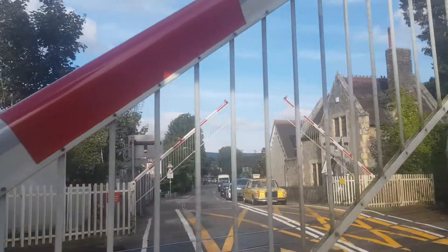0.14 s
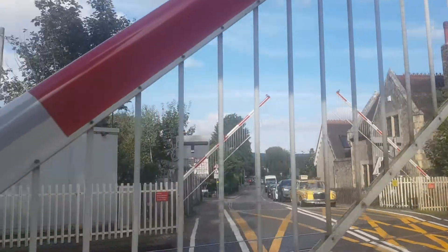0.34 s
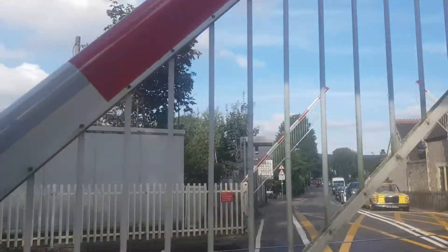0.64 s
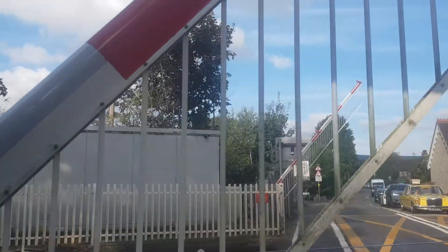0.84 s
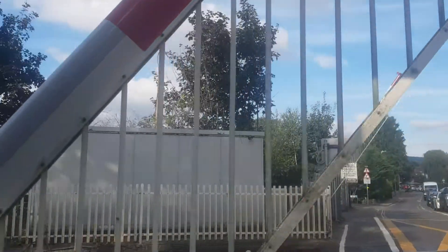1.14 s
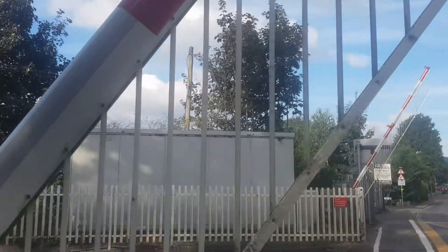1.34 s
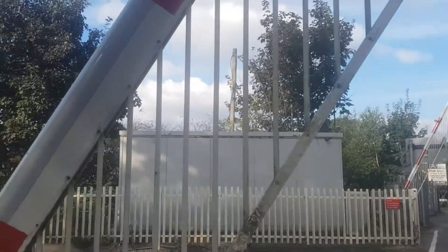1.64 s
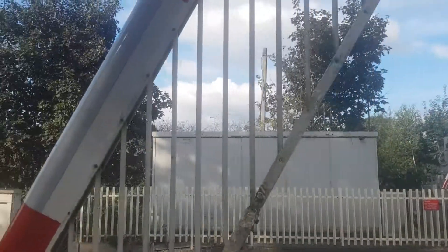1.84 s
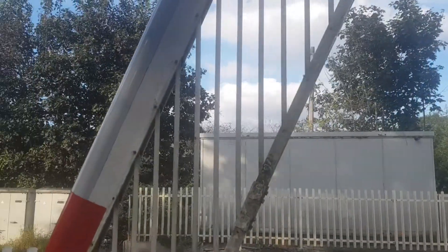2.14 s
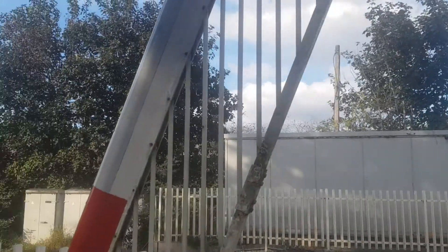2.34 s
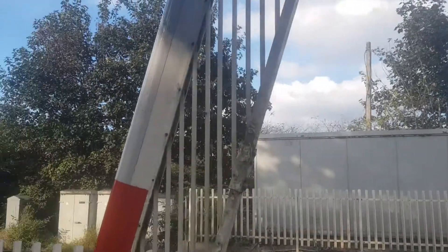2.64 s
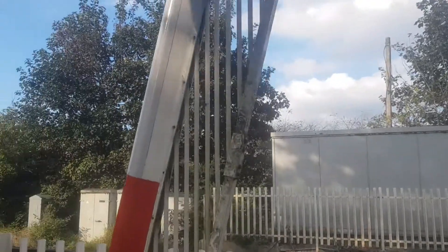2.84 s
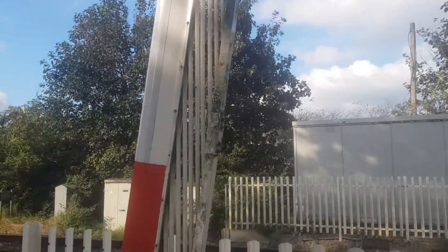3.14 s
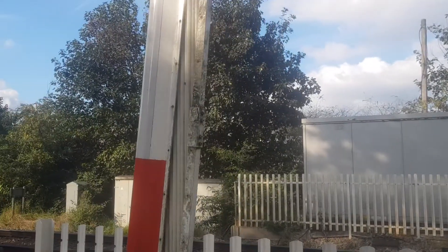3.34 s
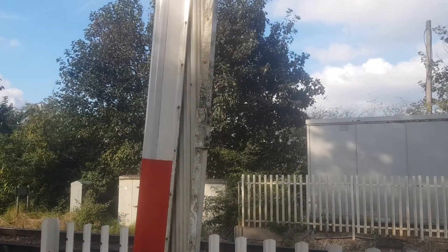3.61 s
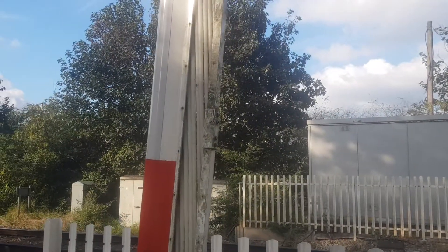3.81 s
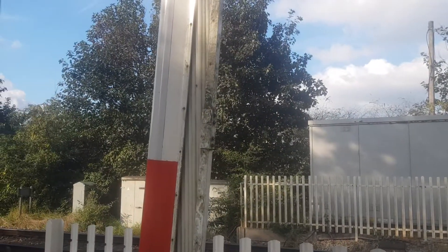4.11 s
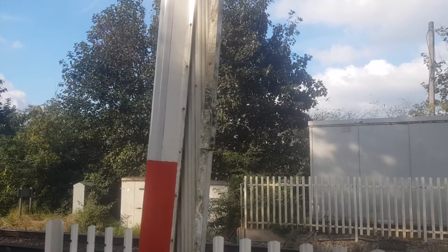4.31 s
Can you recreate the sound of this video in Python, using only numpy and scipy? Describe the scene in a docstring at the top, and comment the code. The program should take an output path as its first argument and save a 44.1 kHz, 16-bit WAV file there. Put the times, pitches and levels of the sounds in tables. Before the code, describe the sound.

From the start, the hydraulic pump of a level crossing barrier hums steadily close to the microphone, a mid-pitched, slightly buzzy tone that wavers as fainter pumps farther off beat against it. The pivot gives a few faint, short squeaks in the first quarter second. Underneath, cars pull away outdoors, their engines rising in pitch while road rumble and tyre hiss build over three seconds and shift toward the right. From about 1.4 seconds, loose metal rods rattle lightly, with occasional small clanks. Around 3 seconds the hum swells and rises slightly. At about 3.3 seconds the boom hits its stop with a quick run of heavy, ringing metal knocks, the loudest moment, and the hum cuts out. The rods go on clanking irregularly, most clearly near 3.9 seconds, while the nearest car accelerates with low surges until the end at about 4.5 seconds.

```python
"""Level crossing barrier rising.

Beside a hand-held phone a hydraulic gear pump hums; the pumps of the other booms beat with it.
The dry pivot squeaks, the boom clunks onto its stop and the rods of its folded skirt rattle.
Waiting cars pull away and come closer; the phone turns, leaving the road on its right."""
import sys
import numpy as np
from scipy import signal
from scipy.fft import rfft, irfft
from scipy.io import wavfile
from scipy.ndimage import uniform_filter1d, map_coordinates

SR = 44100
rng = np.random.default_rng(int(sys.argv[2]) if len(sys.argv) > 2 else 0)


def waveform_to_disk(signal):
    """Save audio, clipped to [-1, 1], as 16-bit WAV at the path in sys.argv[1]."""
    frames = np.transpose(np.atleast_2d(signal))
    scaled = np.clip(frames, -1, 1) * 32767
    samples = np.round(scaled).astype(np.int16)
    wavfile.write(sys.argv[1], SR, samples)


N = 197068
TIME = np.arange(N) / SR

# road noise spectra: freq_hz, density_db
RUMBLE_SPECTRUM = [(18, -25.5), (35, -4), (70, 6), (120, -3), (200, 0), (300, -14), (450, -18.5),
                   (700, -44)]
ROAR_SPECTRUM = [(200, -4), (380, 4.5), (520, -5), (640, -2), (820, -0.5), (1080, -4.5), (1350, -13.5),
                 (2000, -13.5), (4000, -42)]
HISS_SPECTRUM = [(700, -26), (1300, -3), (2000, -1.5), (3300, -8), (4700, -11.5), (6200, -24),
                 (8300, -34.5), (11500, -23.5), (15500, -36.5)]
# left port's lag for sound from the road: time_s, lag_ms
ROAD_LAG = [(0, -0.25), (1.2, -0.19), (1.7, 0.33), (2.5, 0.31), (4.47, 0.43)]
# engine speeds of three cars: time_s, firing_hz
FIRST_SPEED = [(0, 79.83), (1.42, 83.94), (1.7, 110.6), (2.1, 118.8)]
SECOND_SPEED = [(1.8, 86.93), (2.8, 110.5), (3.3, 112.3)]
NEAR_SPEED = [(1.9, 66.26), (2.55, 72.6), (2.95, 84.9), (3.13, 74.24), (3.45, 77.17), (3.92, 88.3),
              (4.47, 104.7)]
# their exhaust partials: firing_multiple, gain_db
FIRST_EXHAUST = [(.5, -9.5), (1, -1), (1.5, -12), (2, -15), (2.5, -10.5), (3.5, -18.5)]
SECOND_EXHAUST = [(.5, -18.5), (1, -0.5), (2, -4), (3, -16.5)]
NEAR_EXHAUST = [(.5, -29), (1, -3), (1.5, -25.5), (2, -17.5), (3, -18.5), (4, -20.5)]
# their swells under load: start_s, end_s, level_db, swell_db_per_s
FIRST_PULL = (0, 1.88, -47, 5.5)
SECOND_PULL = (2.05, 3, -41, 3)
NEAR_PULL = (2, 5, -40.5, 5)
# surges of the nearest exhaust: start_s, end_s, lift_db
SURGES = [(2.05, 2.073, 7), (2.655, 2.816, 10), (2.95, 3.045, 7), (3.768, 3.914, 8), (4.068, 4.22, 11),
          (4.34, 4.424, 9)]
# pumps of two further booms: start_s, end_s, tooth_hz, sag_hz_per_s, level_db, swell_db_per_s
FAR_PUMPS = [(0, 1.296, 329, 5.5, -44, -4), (0.893, 3.093, 352.4, 4.5, -49.5, 4.5)]
# near pump, speeding up as the load comes off: time_s, tooth_hz
PUMP_SPEED = [(0, 360), (.5, 358.4), (1.2, 357.2), (1.6, 358.2), (2.85, 356.8), (3.12, 365), (3.3, 366)]
# its hum: time_s, fundamental_db, octave_db
PUMP_HUM = [(0, -29.5, -41.5), (.65, -31.5, -44.5), (1, -31, -39), (1.5, -30, -40.5), (1.8, -28.5, -43),
            (2.35, -33, -43.5), (2.82, -39, -43), (3.02, -27.3, -43), (3.3, -29, -44.5)]
# its overtones: tooth_multiple, re_fundamental_db
PUMP_OVERTONES = [(4, -37), (5, -37), (6, -37.5), (8, -36.5)]
# its gear buzz: freq_hz, density_db
BUZZ_SPECTRUM = [(400, -27.5), (700, 13.5), (1100, -6), (1500, -12), (3000, -20), (4800, -16), (7000, -23),
                 (9000, -50.5)]
# pivot squeaks: start_s, length_s, pitch_hz, level_db
SQUEAKS = [(0.045, 0.059, 2353, -54.5), (0.175, 0.035, 2370, -54), (0.206, 0.045, 2280, -46.5),
           (1.062, 0.026, 4840, -62)]
# skirt rod modes: freq_hz, gain_db
ROD_MODES = [(1816, -6), (2106, 0), (2170, 0), (2400, -4), (2660, -1), (2790, -4), (2900, -3), (3110, -2),
             (3340, 0), (3600, -6), (3900, -6), (4650, -11)]
# bouts of rattle as the skirt folds and settles: start_s, end_s, level_db, swell_db_per_s
JIGGLES = [(0, .28, -63, -10), (1.52, 2.203, -53, 5), (2.394, 3.014, -57, 14.5), (3.403, 4.47, -58.5, 11.5)]
# rod clanks: start_s, level_db, hardness_db (tick over ring), pitch_hz
CLANKS = [(1.362, -46.5, -16.5, 2500), (2.260, -44, 2.5, 6120), (2.618, -43, -13, 3340),
          (3.060, -44, -11, 3480), (3.115, -44.5, -7, 2300), (3.419, -39.5, -16, 2500),
          (3.476, -37.5, -35, 1810), (3.615, -37, -6, 2502), (3.653, -44.5, -7, 3550),
          (3.709, -39, -14, 3290), (3.900, -39, -10, 2140), (3.920, -33, -11.5, 2200),
          (4.149, -39, -1.5, 5900), (4.221, -41.5, -6.5, 2860), (4.344, -40, -5, 2430),
          (4.448, -41, -9, 1990)]
# boom and pedestal modes: freq_hz, gain_db, t60_s
BOOM_MODES = [(287.8, 0.5, 0.53), (317, -9.5, 0.21), (341, 3, 0.26), (378, 0.5, 0.41), (418.6, -2, 0.52),
              (487, -9, 0.49), (777, 0.5, 0.13), (1272, -3, .15), (1534, -9, .2), (1818, -3, .18),
              (2106, 4, .26), (2202, 2, .21), (2458, -5, .2), (3600, -17, 0.05), (4970, -10, 0.17),
              (5100, -9, .14)]
# dense high modes of a blow: freq_hz, density_db
CRACK_SPECTRUM = [(100, -18), (300, 1.5), (500, 0.5), (900, -8.5), (2200, 2), (3300, -7), (5200, -8.5),
                  (6800, -24), (8500, -34), (11000, -19.5), (13000, -20.5), (16000, -25)]
# blows of the boom on its stop: start_s, thud_db, ring_db, tick_db, chatter_s, pitch_hz
LANDING = [(3.281, -23, -37.5, -72, 0.011, 1095), (3.293, -27, -51, -44, 0.0014, 1471),
           (3.343, -30, -26.5, -44, 0.0053, 2290), (3.353, -24, -21.5, -29.5, 0.0057, 2153),
           (3.365, -22.5, -31.5, -50, 0.014, 1720)]
# microphone port mismatch: freq_hz, left_over_right_db
PORT_BALANCE = [(60, 1.4), (300, 0.8), (1000, 0.1), (2000, -0.5), (4000, -0.5), (8000, -1.5), (12000, 1.5)]


def undb(db):
    """Decibels to gain."""
    return 10 ** (np.asarray(db) / 20)


def unit(x):
    """Scale to rms 1."""
    return x / np.sqrt(np.mean(x ** 2))


def curves(rows):
    """Table columns, interpolated over time."""
    times_s, *columns = np.transpose(rows)
    return [np.interp(TIME, times_s, column) for column in columns]


def walk(rate_hz):
    """Random steps, smoothed twice; spread near 1."""
    hold = max(int(SR / rate_hz), 20)
    steps = rng.standard_normal(N // 20 + 1)[np.arange(N) // hold]
    return 1.26 * uniform_filter1d(uniform_filter1d(steps, hold), hold)


def decay(t, t60_s):
    """Exponential fall, 60 dB in t60_s."""
    return np.exp(-np.log(1000) * t / t60_s)


def gate(start_s, end_s, attack_s, release_s):
    """Trapezoid, fully open from start_s to end_s."""
    return np.clip(np.minimum(1 + (TIME - start_s) / attack_s, 1 - (TIME - end_s) / release_s), 0, 1)


def swell(start_s, end_s, level_db, db_per_s, attack_s, release_s):
    """Gated gain, ramping in dB while open."""
    elapsed_s = np.clip(TIME, start_s, end_s) - start_s
    return undb(level_db + db_per_s * elapsed_s) * gate(start_s, end_s, attack_s, release_s)


def cycles(hz):
    """Running cycle count."""
    return np.cumsum(hz) / SR + rng.random()


def tone(turns):
    """Sine of rms 1, random phase."""
    return np.sqrt(2) * np.sin(2 * np.pi * (turns + rng.random()))


def colour(x, spectrum):
    """Shape by a spectrum, falling 20 dB per octave past its ends; rms 1."""
    hz, db = np.transpose(spectrum)
    octave = np.log2(np.maximum(np.fft.rfftfreq(x.shape[-1], 1 / SR), 1))
    beyond = np.abs(octave - np.clip(octave, np.log2(hz[0]), np.log2(hz[-1])))
    gain = undb(np.interp(octave, np.log2(hz), db) - 20 * beyond)
    return unit(irfft(rfft(x) * gain, x.shape[-1]))


def ports(x, lag_ms):
    """Arrival at two microphone ports; positive lag puts the source on the right."""
    at, half_lag = np.arange(len(x)), lag_ms * SR / 2000
    return np.array([map_coordinates(x, [at + side * half_lag], order=3, mode="nearest")
                     for side in (-1, 1)])


def diffuse(size):
    """Noise from all around: alike at both ports in the bass, unrelated in the treble."""
    mid, side = rfft(rng.standard_normal((2, size)))
    coherence = 0.985 * np.sinc(np.fft.rfftfreq(size, 1 / SR) / 1150)
    spectra = mid * np.sqrt(1 + coherence) + side * np.sqrt(1 - coherence) * np.array([[1], [-1]])
    return irfft(spectra, size) / np.sqrt(2)


def road(firings, lag_ms, approach_s=(0.43, 3.14)):
    """Rumble, tyre roar and hiss grow as the cars close in; the hiss clatters once per firing."""
    rumble_db = np.interp(TIME, approach_s, [-43.5, -32.5])
    roar_db = np.interp(TIME, approach_s, [-48, -38])
    hiss_db = np.interp(TIME, approach_s, [-58.5, -43])
    air_db = np.interp(TIME, [2.6, 4.1], [-69, -60])
    pulses = 0.79 + np.exp(-(firings % 1) / 0.15)
    clatter = unit(pulses * undb(2.4 * walk(70)) * rng.standard_normal(N))
    rumble = undb(rumble_db) * colour(diffuse(N), RUMBLE_SPECTRUM)
    roar_gain = undb(roar_db + 0.53 * walk(12))
    roar = roar_gain * colour(diffuse(N) + 0.5 * ports(rng.standard_normal(N), lag_ms), ROAR_SPECTRUM)
    hiss = undb(hiss_db + walk(31)) * colour(diffuse(N) + 0.62 * ports(clatter, lag_ms), HISS_SPECTRUM)
    air = undb(air_db) * colour(diffuse(N), [(9500, -8.5), (11000, -1.5), (15500, 3.5)])
    return rumble + roar + hiss + air


def engine(speed, pull, partials, rough_db, wobble, drone_hz=205, half_width_hz=11, drone_db=9):
    """Uneven firings drive an exhaust that drones at resonance. Returns sound, firing count."""
    firing_hz, = curves(speed)
    firings = cycles(firing_hz * (1 + wobble * walk(30)))
    exhaust = 0
    for k, gain_db in partials:
        lift_db = drone_db / (1 + ((k * firing_hz - drone_hz) / half_width_hz) ** 2)
        exhaust += undb(gain_db + lift_db + rough_db * walk(24.9)) * tone(k * firings)
    return exhaust * swell(*pull, attack_s=0.3, release_s=0.14), firings


def traffic():
    """Three cars pull away over road noise; the nearest exhaust surges."""
    lag_ms, = curves(ROAD_LAG)
    first, _ = engine(FIRST_SPEED, FIRST_PULL, FIRST_EXHAUST, rough_db=2, wobble=0.012)
    second, _ = engine(SECOND_SPEED, SECOND_PULL, SECOND_EXHAUST, rough_db=-1.8, wobble=0.0059)
    near, firings = engine(NEAR_SPEED, NEAR_PULL, NEAR_EXHAUST, rough_db=-0.5, wobble=0.0084)
    surge_db = sum(db * gate(*span_s, attack_s=0.073, release_s=0.1) for *span_s, db in SURGES)
    return ports(first + second + near * undb(surge_db), lag_ms) + road(firings, lag_ms)


def far_pumps():
    """Slightly slower pumps sag in speed and beat against the near one."""
    out = 0
    for start_s, end_s, tooth_hz, sag_hz_per_s, level_db, db_per_s in FAR_PUMPS:
        teeth = cycles(tooth_hz - sag_hz_per_s * (TIME - start_s))
        hum = tone(teeth) + undb(-12.5) * tone(2 * teeth)
        out += hum * swell(start_s, end_s, level_db, db_per_s, attack_s=0.81, release_s=0.67)
    return ports(out, lag_ms=0.05)


def near_pump(stop_s=3.31, release_s=0.071, valve_hz=(1005, 1115)):
    """Gear teeth pulse the oil; their flaws buzz, repeating every five teeth; a valve rushes."""
    tooth_hz, = curves(PUMP_SPEED)
    hum_db, octave_db = curves(PUMP_HUM)
    teeth = cycles(tooth_hz * (1 + 0.00071 * walk(25)))
    hum = undb(hum_db + 0.36 * walk(51)) * tone(teeth)
    hum += undb(octave_db + walk(25)) * tone(2 * teeth)
    whine = sum(undb(db + 2 * walk(13)) * tone(k * teeth) for k, db in PUMP_OVERTONES)
    flaws = np.interp(teeth / 5 % 1, np.linspace(0, 1, 500), rng.standard_normal(500))
    buzz = undb(-22.5) * colour(flaws, BUZZ_SPECTRUM)
    valve = signal.butter(2, valve_hz, "band", fs=SR, output="sos")
    flow = undb(octave_db - 11) * unit(signal.sosfilt(valve, rng.standard_normal(N)))
    running = np.clip(1 + (stop_s - TIME) / release_s, 0, 1)
    return ports(running * (hum + undb(hum_db) * (whine + buzz) + flow), lag_ms=-0.13)


def pivot(tail_t60_s=0.22, tail_db=-5):
    """The dry pivot gives short, unsteady squeaks that linger in the boom."""
    squeaks, t = 0, TIME[:SR // 4]
    for start_s, length_s, pitch_hz, level_db in SQUEAKS:
        progress = np.clip((TIME - start_s) / length_s, 0, 1)
        arch = np.sqrt(np.maximum(np.sin(np.pi * progress), 0))
        squeaks += undb(level_db) * arch * tone(cycles(pitch_hz * (1 + 0.018 * walk(400))))
    response = rng.standard_normal((2, len(t))) * decay(t, tail_t60_s)
    tail = signal.fftconvolve(squeaks[None], response / np.linalg.norm(response[0]))[:, :N]
    return ports(squeaks, lag_ms=-0.035) + undb(tail_db) * tail


def skirt_rattle(count=1300, scatter_db=3, t60_s=0.052):
    """Loose rods touch their sockets at random; each touch rings its own mix of modes."""
    shaking = sum(swell(*bout, attack_s=0.055, release_s=0.16) for bout in JIGGLES)
    lag_ms, = curves(ROAD_LAG)  # the skirt reaches over the road
    at = rng.integers(0, N, count)
    sizes = undb(scatter_db * rng.standard_normal(count))
    rattle, t = 0, TIME[:SR // 4]
    for hz, db in ROD_MODES:
        touches = np.bincount(at, sizes * rng.standard_normal(count), N)
        ring = decay(t, t60_s) * np.sin(2 * np.pi * hz * t)
        rattle += undb(db) * signal.fftconvolve(touches, ring)[:N]
    return ports(shaking * unit(rattle), lag_ms)


def blow(t, chatter_s, pitch_hz):
    """Chattering contacts ring the boom and the part struck; the surroundings add a tail."""
    modes = sum(undb(db + rng.standard_normal()) * decay(t, t60_s) * tone(hz * t)
                for hz, db, t60_s in BOOM_MODES)
    struck_part = undb(-5) * decay(t, t60_s=0.066) * tone(pitch_hz * t)
    build_up = 1 - np.exp(-2 * t / chatter_s)  # contacts keep feeding the modes
    bounces = undb(2.3 * walk(600)[:len(t)])
    contact = np.exp(-0.5 * (t / chatter_s) ** 2) + 0.37 * decay(t, t60_s=0.15)
    tail = undb(-19) * decay(t, t60_s=0.38)
    noise = diffuse(len(t)) + 0.5 * ports(rng.standard_normal(len(t)), lag_ms=-0.045)
    crack = colour(noise, CRACK_SPECTRUM) * bounces * build_up * (contact + tail)
    return crack + ports((undb(-15) * modes + struck_part) * build_up, lag_ms=-0.063)


def impacts(rows, low_hz=1100, high_hz=7500):
    """Blows split into thud, ring and tick bands, each levelled over its first 20 ms."""
    out, t = np.zeros((2, N + SR)), TIME[:SR // 2]
    filters = [signal.butter(3, hz, kind, fs=SR, output="sos")
               for hz, kind in ((low_hz, "low"), ((low_hz, high_hz), "band"), (high_hz, "high"))]
    dampings = 1, 1, 0.49 + decay(t, t60_s=0.015)  # the first, hardest contacts tick most
    for start_s, *levels_db, chatter_s, pitch_hz in rows:
        hit, at = blow(t, chatter_s, pitch_hz), int(start_s * SR)
        for sos, level_db, damping in zip(filters, levels_db, dampings):
            band = signal.sosfilt(sos, hit) * damping
            out[:, at:at + len(t)] += undb(level_db) * band / np.std(band[:, :SR // 50])
    return out[:, :N]


def rod_clanks():
    """Light blows of the skirt rods; hard contacts chatter more briefly."""
    rows = []
    for start_s, level_db, hardness_db, pitch_hz in CLANKS:
        chatter_s = np.clip(0.0052 - 0.5 * hardness_db, 0.002, 0.008)
        rows.append((start_s, level_db - 1.5, level_db, level_db + hardness_db, chatter_s, pitch_hz))
    return impacts(rows)


def boom_landing():
    """The boom meets its stop in a quick run of heavy blows."""
    return impacts(LANDING)


def scene():
    """The barrier machines in front of the road."""
    background = near_pump() + far_pumps() + traffic()
    return background + skirt_rattle() + boom_landing() + rod_clanks() + pivot()


def record(dry, cutoff_hz=15750):
    """The two ports differ slightly in colour; the phone cuts the top."""
    hz, db = np.transpose(PORT_BALANCE)
    balance_db = np.interp(np.log(np.fft.rfftfreq(N, 1 / SR) + 1), np.log(hz), db)
    heard = irfft(rfft(dry) * undb(np.array([balance_db, -balance_db]) / 2), N)
    return signal.sosfilt(signal.ellip(10, 0.2, 80, cutoff_hz, fs=SR, output="sos"), heard)


dry = scene()
out = record(dry)
waveform_to_disk(out)
```